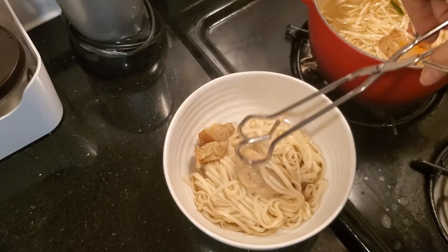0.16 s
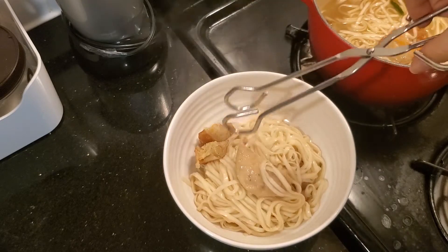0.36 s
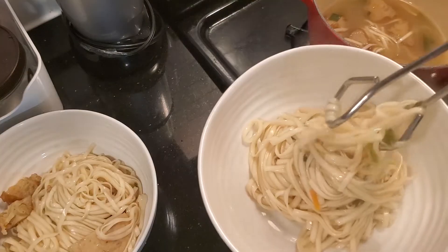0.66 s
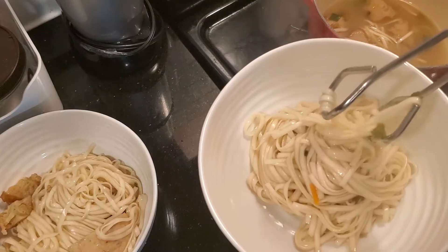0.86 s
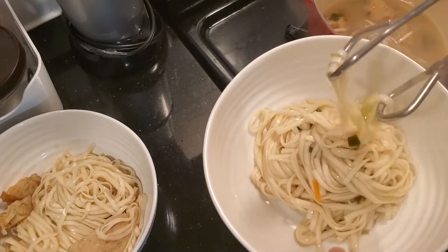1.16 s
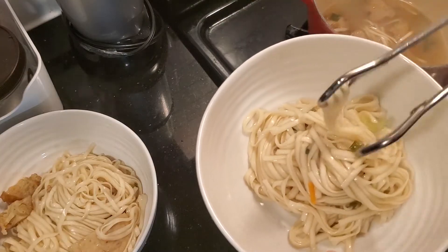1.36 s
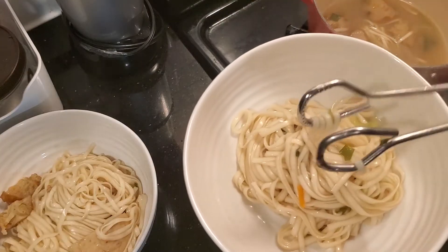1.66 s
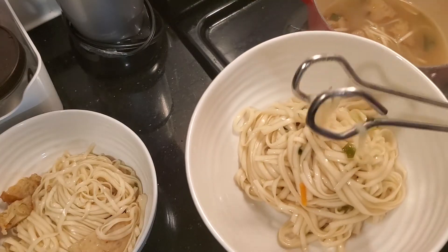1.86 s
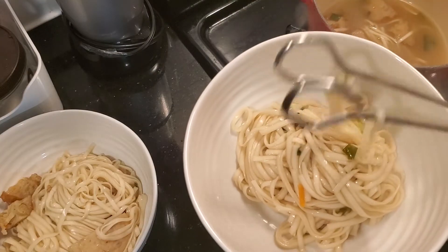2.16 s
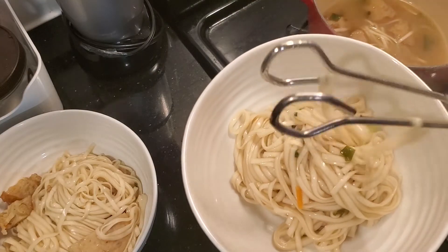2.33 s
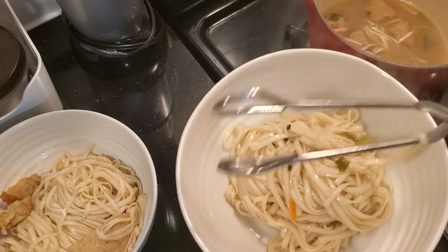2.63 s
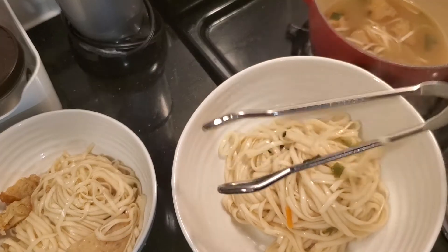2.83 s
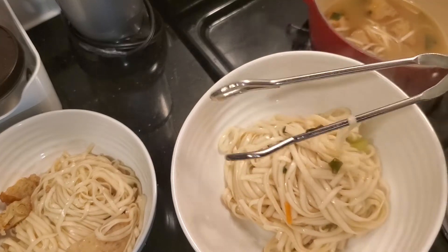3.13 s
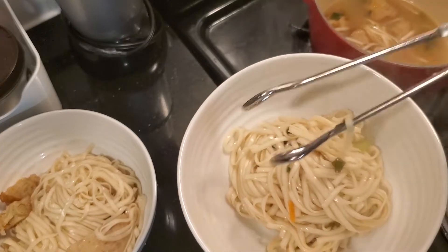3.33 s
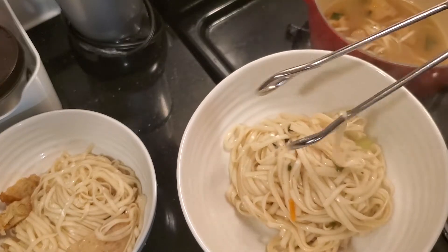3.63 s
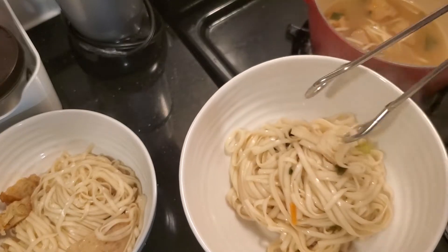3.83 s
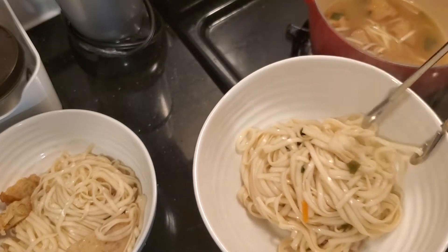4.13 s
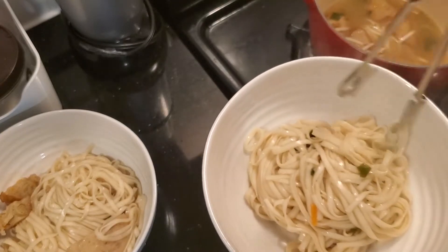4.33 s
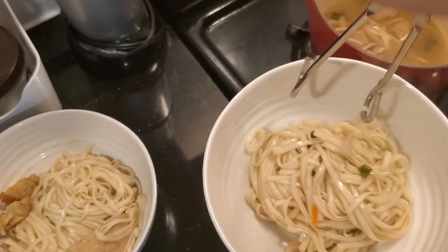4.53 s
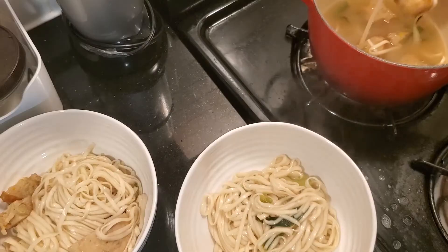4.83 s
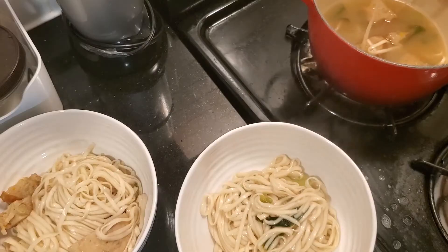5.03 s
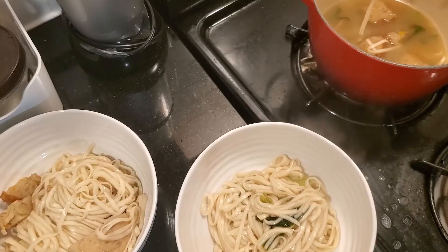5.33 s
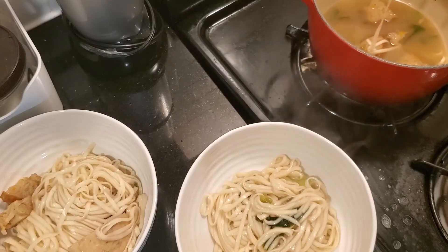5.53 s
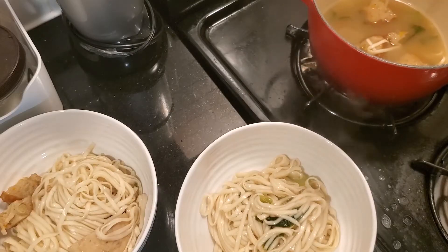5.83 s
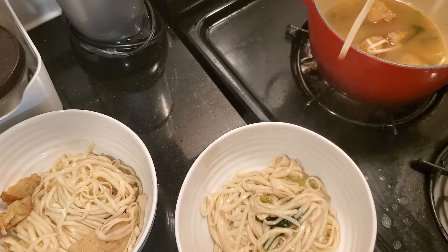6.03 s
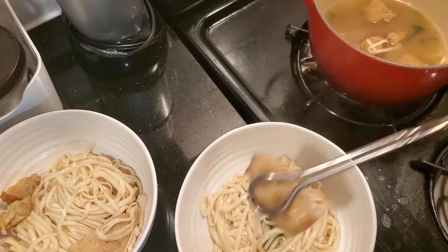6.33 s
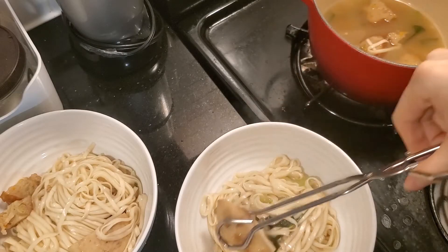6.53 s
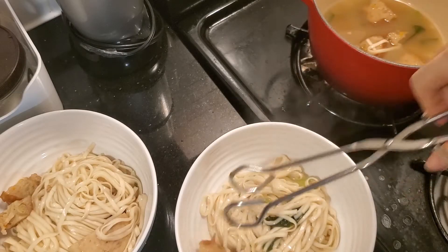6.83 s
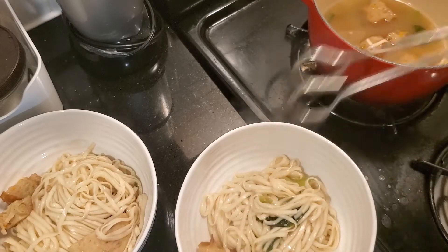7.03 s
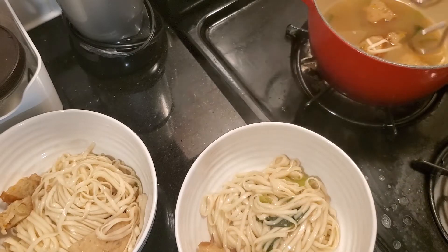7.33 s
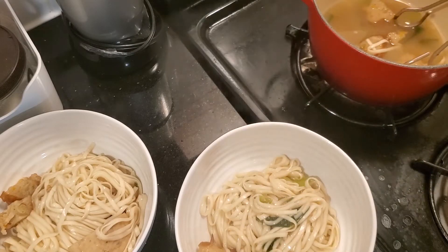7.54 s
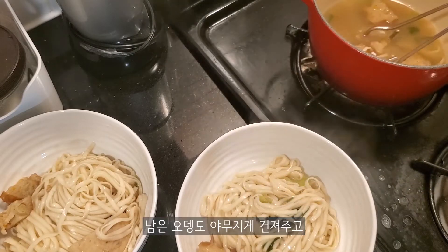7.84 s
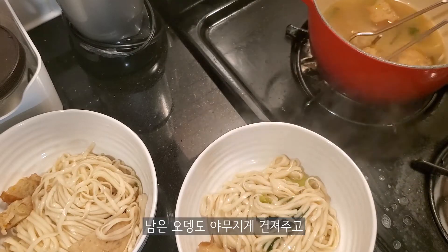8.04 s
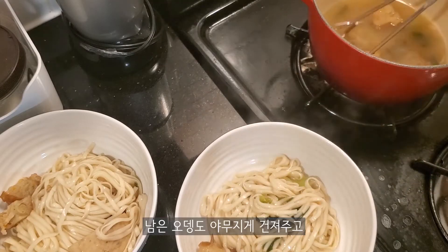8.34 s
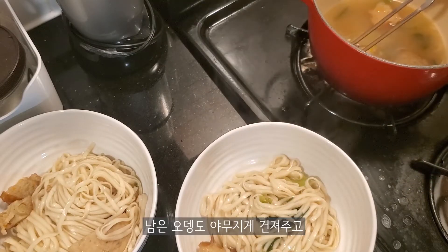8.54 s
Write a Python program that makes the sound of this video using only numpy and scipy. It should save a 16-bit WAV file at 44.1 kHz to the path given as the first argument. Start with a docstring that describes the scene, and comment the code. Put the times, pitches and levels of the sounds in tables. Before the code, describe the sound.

Small home kitchen with a steady low compressor hum and soft air noise. A brief soup trickle and faint wet smacks come first, then steel tongs clink on a ceramic bowl, close and bright, with one strongest ringing tap that stops short. After more tiny wet sounds, the tongs clank on a soup pot farther back and stir the liquid. Close stereo microphones, short room reflections.

```python
"""Steel tongs clink on a ceramic bowl close to the microphones: dense steel modes clack, tuned modes ring.
Later, farther back, they clank on a pot of soup, which rings dully, and stir it: spattering noise.
Wet smacks, a trickle (puffs and a surge of noise), dry ticks and low handling bumps lie around them.
Behind is a small kitchen: noise for air and hiss, steady sines for hum and whine.
A near microphone pair hears the bowl, food and pot with a short tail of dense reflections."""
import sys
import numpy as np
from scipy import signal
from scipy.fft import rfft, irfft
from scipy.io import wavfile

SR = 44100
rng = np.random.default_rng(int(sys.argv[2]) if len(sys.argv) > 2 else 0)


def store_wav(level_fs):
    """Save 16-bit WAV to argv[1]."""
    pcm = np.round(np.clip(np.atleast_2d(level_fs), -1, 1) * 32767)
    wavfile.write(sys.argv[1], SR, pcm.T.astype(np.int16))


N = 383096
RING_TIME = np.arange(SR) / SR  # s, the time axis of one struck sound
EDGE_HZ = 15900  # upper band limit of the recorder

# air of the kitchen, rumble and hiss: [f/Hz, relative density/dB]
AIR_RUMBLE = [(15, -20.5), (35, 5.5), (48, 0), (70, 6), (105, 1), (150, -3), (185, 1.5), (220, -7),
              (265, 1.5), (315, 4), (342, -4), (400, 2.5), (490, 0), (700, -16)]
AIR_HISS = [(500, 1), (750, 4.5), (1100, 0.5), (1700, 2), (2150, -2), (2420, -2), (2900, -9), (3500, -7.5),
            (4300, -17.5), (7300, -17), (8500, -25.5), (11000, -22), (12500, -15), (16000, -15.5)]
RUMBLE_DB, HISS_DB = -55, -65.5  # before the lean between the channels
# compressor hum and thin whine, steady lines: [f/Hz], then in the same order [level/dB]
HUM_HZ = [59.4, 119.6, 200, 239.6, 356.4, 421.5, 475.2, 620, 926, 1100]
HUM_DB = [-58, -56, -67, -71, -69.5, -64.5, -70.5, -75, -81.5, -79]
WHINE_HZ = [2256, 2315, 2374.5, 2433.5, 3384, 3443.5, 3562, 7241]
WHINE_DB = [-96.5, -96.5, -78, -83, -87.5, -87.5, -93.5, -101]
# likeness of the two microphones, limited to -1..1 in use: [f/Hz, likeness]
LIKENESS = [(100, 1.03), (280, 0.9), (400, 0.07), (1200, 0.45), (2500, -0.28), (5000, 0)]
# phase by which the left microphone leads: [f/Hz, lead/rad]
LEFT_LEAD = [(60, .05), (380, .15), (550, 1.5), (1250, 2.3), (2400, 6.5)]
# level difference between the microphones: [f/Hz, L-R/dB]
LEAN = [(60, -1), (180, 5.5), (280, -3), (400, 2), (800, 2.5), (2000, -0.5), (8000, 0)]
# decay of the room tail: [f/Hz, t60/s]
ROOM_DECAY = [(200, 0.48), (1300, 0.31), (3000, 0.42), (6000, 0.39), (10000, 0.22), (16000, 0.16)]

# soft low bumps of handling: [t/s, level/dB, f/Hz, t60/s]
BUMPS = [(0.02, -52, 61.4, 5.2), (3.111, -50.5, 35.6, 1.5)]
# tiny dry ticks: [t/s, level/dB]
TICKS = [(0.5122, -43), (6.428, -44)]

# the clearest wet smacks: [t/s, level/dB, centre f/Hz]
SMACKS = [(.724, -71, 4500), (.867, -65.5, 5900), (5.711, -69, 6800), (6.344, -67, 7500),
          (6.406, -64, 2350), (6.806, -67.5, 3460), (6.811, -59, 9100)]
SMACK_WIDTH_HZ, SMACK_CYCLES = 1450, 410  # shared bandwidth; cycles of the centre pitch in one t60
# spells of fainter smacks at random while food is laid in the bowl: [start t/s, end t/s]
SERVING = [(.55, 1.1), (6.35, 7.25)]
FAINT_DB, FAINT_SPREAD_DB, FAINT_HZ = -71.5, 3, 7940  # middle level, spread to either side, middle pitch
# soup running off the food: [f/Hz, relative density/dB]
TRICKLE_COLOUR = [(600, -8.5), (1300, -6), (2000, 0.5), (4000, -7), (7500, -13.5), (9000, -21),
                  (16000, -20.5)]
TRICKLE_S, TRICKLE_DB, TRICKLE_RISE_S, TRICKLE_HOLD_S, TRICKLE_T60_S = 0, -61, 0.0028, 0.12, 0.42

# tongs on the pot: [t/s, blow level/dB]
CLANKS = [(7.689, -27.5), (7.8345, -38.5), (7.91, -47.5), (8.038, -50.5), (8.142, -50.5), (8.285, -51),
          (8.3769, -36.5)]
# steel against the pot wall: [f/Hz, relative density/dB]
CLANK_COLOUR = [(400, -17), (950, -2), (1300, 6), (1650, 3), (1900, 0.5), (2600, 7), (3900, 6), (5200, 5),
                (6600, 4), (7800, 8), (9200, -6), (11000, -4.5), (12500, -2), (16000, -14)]
# modes of the pot, damped by soup: [f/Hz, relative level/dB, t60/s]
POT_MODES = [(1188, -43, 0.28), (1328, -42.5, 0.26), (1385, -46.5, 0.54), (1380, -53.5, 0.97),
             (1687, -46, 0.18), (2220, -73, 0.34), (2660, -57.5, 0.56), (2980, -63, 0.46),
             (3870, -42, 0.072), (4920, -38.5, 0.054)]
# softer blows on the pot scuff for a different time: [blow level/dB, t60/s]
SCUFF_T60 = [(-44, 0.092), (-53, 0.069)]
# softer blows are duller; the pot rings in proportion to the blow
POT_FIRM_DB, POT_DULLING_DB_PER_DB, POT_RING_DB = -31.5, 0.5, 29.5
# strokes of the tongs through the soup: [t/s, level/dB, t60/s]
STIRS = [(7.72, -48.5, 1.46), (8.38, -56.5, 0.5)]
# soup stirred in the pot: [f/Hz, relative density/dB]
STIR_COLOUR = [(900, -20), (1250, 8.5), (1480, -1), (1800, -1.5), (2200, 0.5), (2700, -1.5), (3500, -19),
               (7500, -19.5), (9000, -37), (16000, -44.5)]
STIR_RISE_S, STIR_HOLD_S = 0.073, 0.011

# pitches of the bowl's modes: [f/Hz]
BOWL_HZ = [910, 1993, 2018, 3388, 3421, 5066, 5150, 6275, 6800, 6885, 6945, 9024, 10190, 10325, 11400,
           11878, 13928]
# the same modes in the same order: [relative level/dB, t60/s, L-R/dB]
BOWL_MODES = [(-60, .85, -5.5), (-40, .85, 5.5), (-34, .13, -1.5), (-42, .4, -2), (-42, .25, -2.5),
              (-34.5, 0.3, 0), (-45, .22, -1), (-60, .3, -1), (-24.5, 0.046, 0), (-37.5, 0.32, -3.5),
              (-35.5, .3, -4), (-40, 0.36, 9), (-33.5, .19, -1.5), (-39, .19, -3.5), (-42, 0.38, -5),
              (-41, 0.31, -7), (-33, 0.16, -6)]
# tongs on the bowl: [t/s, blow level/dB, ring level/dB, favoured f/Hz, clack tilt/(dB/octave), knock level/dB]
CLINKS = [(1.937, -33.5, -22.5, 7050, 3.5, -23), (1.9776, -47, -22.5, 3900, -4, -34.5),
          (4.1648, -28, -12.5, 4200, -1, -54), (4.2815, -40, -16, 3700, -6.5, -72.5),
          (4.3328, -19, 0, 6670, 0, -46)]
# dense, quickly dying modes of the tongs: [f/Hz, relative density/dB]
CLACK_COLOUR = [(300, -51.5), (800, -23), (1500, -5.5), (2300, 2.5), (3000, 1.5), (4000, -1), (5000, 5.5),
                (5950, -4), (6800, 4), (8400, -12.5), (10300, -1.5), (11900, 4), (12900, -10), (14200, -3),
                (16000, -18)]
# the bowl knocking on the worktop: [f/Hz, relative level/dB, t60/s, L-R/dB]
KNOCK_MODES = [(554, -18.5, .03, 13.5), (627, -7.5, 0.026, -2.5), (978, -1.5, 0.041, -4.5),
               (1060, -14.5, 0.093, -2)]
# a blow softer than FIRM_DB grazes: its ring is duller, swells more slowly and depends more on the spot
FIRM_DB = -18
RING_TILT_DB, DULLING_DB_PER_DB = -4.5, 0.17  # per octave: for a firm blow, and lost for each dB softer
SWELL_S, SWELL_DOUBLES_DB = 0.00084, 8  # of a firm blow; softness that doubles it
SPOT_DB, GRAZE_RANGE_DB = 10.5, 5.5  # full boost of favoured modes; softness over which it sets in
RING_STOP_S = 4.665  # the bowl is silent from here


def amp(db):
    """Decibels to gain."""
    return 10 ** (np.asarray(db) / 20)


def unit(x):
    """Scales to rms 1."""
    return x / np.sqrt(np.mean(x ** 2) + 1e-20)


def read(points, hz):
    """Reads a table along a logarithmic frequency axis."""
    f, value = np.transpose(points)
    return np.interp(np.log(hz + 1), np.log(f + 1), value)


def add(mix, s, sound):
    """Mixes a stereo sound in at time s."""
    part = mix[:, max(round(s * SR), 0):][:, :sound.shape[1]]
    part += sound[:, :part.shape[1]]


def pan(lean_db):
    """Left and right gains for a level difference L-R."""
    return amp([[lean_db / 2], [-lean_db / 2]])


def noise(gain, size, same, phase):
    """Stereo noise of rms 1 from a gain, a likeness and a left lead for each frequency."""
    a, b = np.exp(2j * np.pi * rng.random((2, size // 2 + 1)))
    same = np.clip(same, -1, 1)
    left = a * np.exp(1j * phase)
    right = same * a + np.sqrt(1 - same ** 2) * b
    return unit(irfft(np.array([left, right]) * gain, size))


def waver(rate_hz, size):
    """Two slow random curves of joint rms 1."""
    hz = np.fft.rfftfreq(size, 1 / SR)
    return noise(np.exp(-(hz / rate_hz) ** 2), size, 0, 0)


def burst(colour, t60, hold=0, same=0.24):
    """A puff of coloured noise that holds briefly, then dies."""
    hz = np.fft.rfftfreq(SR, 1 / SR)
    fade = amp(-60 * np.maximum(RING_TIME - hold, 0) / t60)
    onset = 1 - np.exp(-RING_TIME / 0.00034)
    return noise(amp(read(colour, hz)), SR, same, 0) * fade * onset


def surge(s, db, rise_s, hold_s, t60):
    """Gain of a flow that starts at time s, rises, holds and dies away."""
    t = np.arange(N) / SR - s
    return np.clip(t / rise_s, 0, 1) * amp(db - 60 * np.maximum(t - rise_s - hold_s, 0) / t60)


def slosh(flow, colour, spatter_db):
    """Moving soup: a fizz that follows the flow and, given a spatter, flutters in level."""
    hz = np.fft.rfftfreq(N, 1 / SR)
    fizz = noise(amp(read(colour, hz)), N, 0.064, 0)
    return flow * amp(spatter_db * waver(44, N)[0]) * fizz


def ring(modes, lag_ms, split, twin, early_db, early_s, swell_s, count=4):
    """Modes (f/Hz, level/dB, t60/s, L-R/dB) beat with neighbours detuned by about the share split."""
    out = np.zeros((2, SR))
    t = RING_TIME - np.array([[lag_ms / 1000], [0]])  # the left microphone hears it later
    for hz, db, t60, lean_db in modes:
        main = np.sin(2 * np.pi * (hz * t + rng.random()))
        near_hz = hz * (1 + split * rng.standard_normal(count))
        beats = sum(np.sin(2 * np.pi * (f * t + rng.random((2, 1)))) for f in near_hz) / np.sqrt(count)
        crowding = twin * min(hz / 6000, 1)  # neighbours are stronger for high modes
        out += amp(db - 60 * RING_TIME / t60) * pan(lean_db) * (main + crowding * beats)
    swell = 1 - np.exp(-RING_TIME / swell_s)
    early = amp(early_db * np.exp(-RING_TIME / early_s))  # a boost or cut that soon wears off
    return out * swell * early


def steel_modes(count):
    """Irregularly spaced pitches from 100 Hz to 16 kHz."""
    return (np.arange(count) + rng.random(count)) * EDGE_HZ / count + 100


def cloud(pitches_hz, colour, t60, tilt_db, hold, lag_ms, scatter):
    """Many close modes of bent steel, unevenly excited by each blow, die once the contact ends."""
    strength, phase, life, left, right = rng.standard_normal((5, len(pitches_hz)))
    gains = amp(read(colour, pitches_hz) + tilt_db * np.log2(pitches_hz / 5000) + 3.3 * strength)
    shifts = np.array([scatter * left - 2 * np.pi * pitches_hz * lag_ms / 1000, scatter * right])
    heard = gains * np.exp(1j * (2 * np.pi * phase + shifts))
    out = np.zeros((2, SR))
    for lasting, group in ((1, life < .8), (2, life >= .8)):  # some modes ring twice as long
        spectrum = np.zeros((2, SR // 2 + 1), complex)
        spectrum[:, np.round(pitches_hz[group]).astype(int)] = heard[:, group]
        out += irfft(spectrum) * amp(-60 * np.maximum(RING_TIME - hold, 0) / (t60 * lasting))
    onset = 1 - np.exp(-RING_TIME / 0.0005)
    return out * SR / np.sqrt(2) / np.linalg.norm(gains) * onset


def kitchen(x, wet_db, delay=0.0039):
    """Dense reflections from walls and cupboards, each band dying at its own speed."""
    hz, t, z = signal.stft(rng.standard_normal((2, SR)), SR, nperseg=256)
    decay = amp(-60 * t / read(ROOM_DECAY, hz)[:, None])
    tail = signal.istft(z * decay, SR, nperseg=256)[1][:, :SR]
    tail = tail * np.clip(RING_TIME / delay - 1, 0, 1)  # silent for one delay, full after two
    return x + amp(wet_db) * signal.fftconvolve(x, tail / np.linalg.norm(tail[0]), axes=1)[:, :N]


def lines(pitches_hz, levels_db, sway_db):
    """Steady motor tones that share a slight drift of speed and strength."""
    drift, swell = waver(1.2, N)
    t = np.arange(N) / SR + 0.00014 * np.cumsum(drift) / SR
    tones = np.zeros((2, N))
    for hz, db in zip(pitches_hz, levels_db):
        lead = np.array([[read(LEFT_LEAD, hz)], [0]])
        tones += amp(db) * np.sin(2 * np.pi * (hz * t + rng.random()) + lead)
    return np.sqrt(2) * tones * amp(sway_db * swell)


def appliances():
    """Moving air and faint hiss, under a hum and a thin whine from the left."""
    hz = np.fft.rfftfreq(N, 1 / SR)
    same, lead = read(LIKENESS, hz), read(LEFT_LEAD, hz)
    rumble = amp(RUMBLE_DB) * noise(amp(read(AIR_RUMBLE, hz)) / (1 + (hz / 900) ** 6), N, same, lead)
    hiss = amp(HISS_DB) * noise(amp(read(AIR_HISS, hz)), N, same, lead)
    hum = lines(HUM_HZ, HUM_DB, sway_db=1.0)
    whine = lines(WHINE_HZ, WHINE_DB, sway_db=2.5)
    lean = amp(np.outer([.5, -.5], read(LEAN, hz)))
    return irfft(rfft(rumble + hiss + hum) * lean, N) + whine * amp([[4], [-5]])


def bumps():
    """Handling shakes the microphones with a dull rumble: low noise around one pitch."""
    out = np.zeros((2, N))
    for s, db, hz, t60 in BUMPS:
        colour = [(hz / 3, -25), (hz, 0), (hz * 2, -20), (hz * 8, -80)]
        thud = burst(colour, t60, hold=0.099, same=0.99)
        add(out, s, amp(db) * thud * np.minimum(RING_TIME / 0.0081, 1))
    return out


def ticks():
    """Tiny dry ticks: one-sided pulses that die at once, alike at both microphones."""
    out = np.zeros((2, N))
    for s, db in TICKS:
        add(out, s, amp(db) * np.exp(-RING_TIME / 0.00033) * np.ones((2, 1)))
    return out


def smack(db, centre_hz):
    """A wet film parts with a narrow puff; the higher it is, the sooner it dies."""
    hz = np.geomspace(200, 16000, num=40)
    offset = np.log(hz / centre_hz) * centre_hz / SMACK_WIDTH_HZ
    colour_db = -20 * np.log10(1 + offset ** 4)
    return amp(db) * burst(np.c_[hz, colour_db], SMACK_CYCLES / centre_hz)


def food():
    """Small wet smacks as films part, and a short trickle of soup as noise."""
    out = np.zeros((2, N))
    for s, db, centre_hz in SMACKS:
        add(out, s, smack(db, centre_hz))
    for start, end in SERVING:
        for when, strength, pitch in rng.random(size=(3, 3)):  # three faint smacks a spell
            db = FAINT_DB + FAINT_SPREAD_DB * (2 * strength - 1)
            centre_hz = FAINT_HZ * 2 ** (.5 * (pitch - .5))
            add(out, start + when * (end - start), smack(db, centre_hz))
    flow = surge(TRICKLE_S, TRICKLE_DB, TRICKLE_RISE_S, TRICKLE_HOLD_S, TRICKLE_T60_S)
    return out + slosh(flow, TRICKLE_COLOUR, spatter_db=0.0)


def pot():
    """The tongs clank and scuff on the wall of the pot, which rings briefly, and stir the soup."""
    out, wall_hz = np.zeros((2, N)), steel_modes(count=400)
    hz, db, mode_t60 = np.transpose(POT_MODES)
    for s, clank_db in CLANKS:
        tilt_db = POT_DULLING_DB_PER_DB * (clank_db - POT_FIRM_DB)
        t60 = np.interp(clank_db, *np.transpose(SCUFF_T60))
        first = cloud(wall_hz, CLANK_COLOUR, t60, tilt_db, hold=0.0021, lag_ms=0.52, scatter=0.8)
        add(out, s, amp(clank_db) * first)
        # the second arm of the tongs lands a moment later
        second = cloud(wall_hz, CLANK_COLOUR, t60, tilt_db - 2.3, hold=0.0023, lag_ms=0.553, scatter=0.65)
        add(out, s + 0.0076, amp(clank_db - 3.5) * second)
        ring_db = db + clank_db + POT_RING_DB + 1.5 * tilt_db * np.log2(hz / 1300)
        modes = np.c_[hz, ring_db, mode_t60, np.zeros(len(hz))]
        add(out, s, ring(modes, lag_ms=0.585, split=0.019, twin=5.3, early_db=-6.5, early_s=0.0092,
                         swell_s=0.0012, count=3))
    flow = sum(surge(s, stir_db, STIR_RISE_S, STIR_HOLD_S, t60) for s, stir_db, t60 in STIRS)
    return (out + slosh(flow, STIR_COLOUR, spatter_db=3.0)) * amp([[-1.2], [1.0]])


def knock():
    """A few low, heavily damped modes pushed into motion together."""
    out = np.zeros((2, SR))
    for hz, db, t60, lean_db in KNOCK_MODES:
        out += amp(db - 60 * RING_TIME / t60) * pan(lean_db) * np.sin(2 * np.pi * hz * RING_TIME)
    return out * (1 - np.exp(-RING_TIME / .0008))


def bowl():
    """The tongs clack, the bowl rings, and a push on its rim knocks it on the worktop."""
    out, hz, tongs_hz = np.zeros((2, N)), np.array(BOWL_HZ), steel_modes(count=150)
    db, t60, lean_db = np.transpose(BOWL_MODES)
    for s, clack_db, ring_db, spot_hz, clack_tilt_db, knock_db in CLINKS:
        soft_db = max(FIRM_DB - clack_db, 0)
        tilt_db = RING_TILT_DB - DULLING_DB_PER_DB * soft_db
        boost_db = SPOT_DB * (1 - np.exp(-soft_db / GRAZE_RANGE_DB))
        favour = np.exp(-(np.log2(hz / spot_hz) / 0.35) ** 2)  # modes near the spot's pitch
        strike_db = ring_db + tilt_db * np.log2(hz / 5000) + boost_db * favour
        modes = np.c_[hz, db + strike_db, t60, lean_db]
        # a grazing touch feeds the ring for longer than a clean strike
        swell_s = SWELL_S * 2 ** (soft_db / SWELL_DOUBLES_DB)
        add(out, s, ring(modes, lag_ms=.23, split=.005, twin=0.98, early_db=10.5, early_s=0.029, swell_s=swell_s))
        clack = cloud(tongs_hz, CLACK_COLOUR, t60=.055, tilt_db=clack_tilt_db, hold=0.0025,
                      lag_ms=0.2233, scatter=0.93)
        add(out, s, amp(clack_db) * clack * amp([[-1.2], [1.2]]) + amp(knock_db) * knock())
    return out


def scene():
    """Bowl and food are near, and the last ring stops short; the pot stands farther back."""
    background = appliances() + bumps() + ticks()
    ringing = np.clip((RING_STOP_S - np.arange(N) / SR) / 0.015, 0, 1)
    near = kitchen(food(), wet_db=-10.0) + kitchen(bowl(), wet_db=-13.5) * ringing
    return background + kitchen(pot(), wet_db=-11.5) + near


def record(dry):
    """The recorder's steep band limit: a long low-pass filter."""
    lowpass = signal.firwin(511, EDGE_HZ, window=("kaiser", 9), fs=SR)
    return signal.oaconvolve(dry, lowpass[None], "same")


dry = scene()
out = record(dry)
store_wav(out)
```